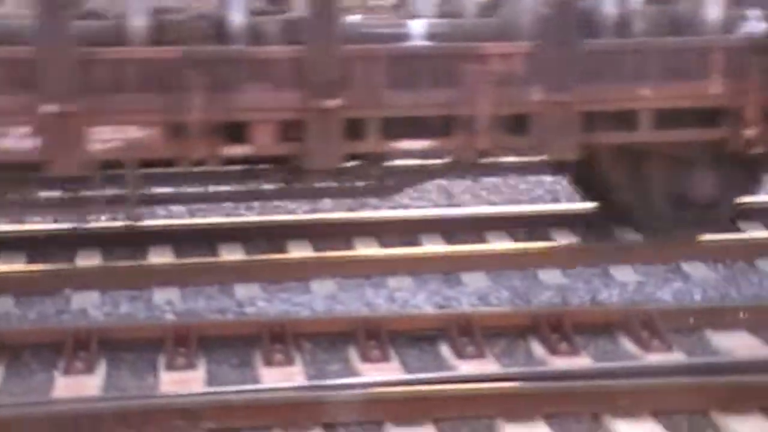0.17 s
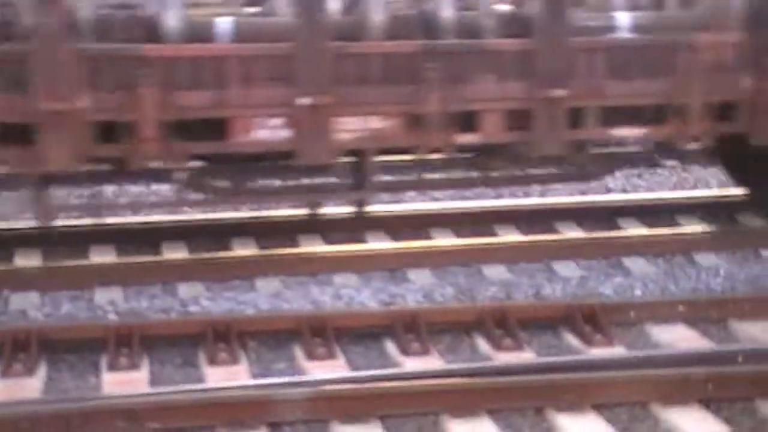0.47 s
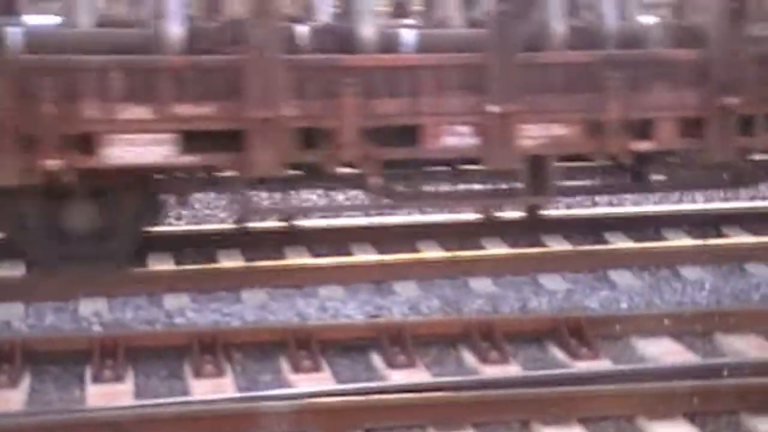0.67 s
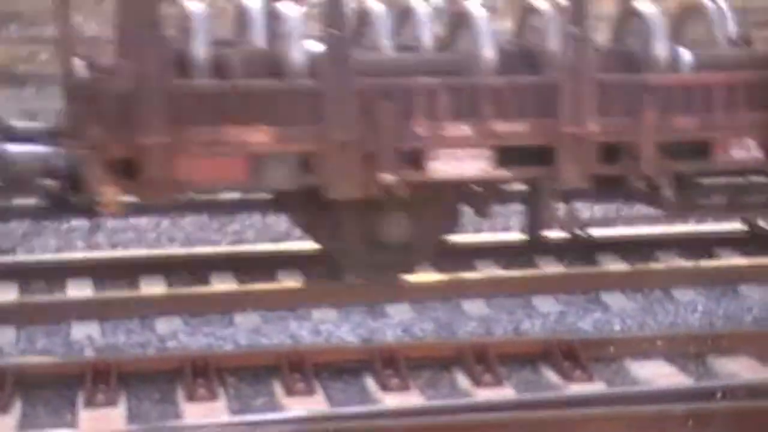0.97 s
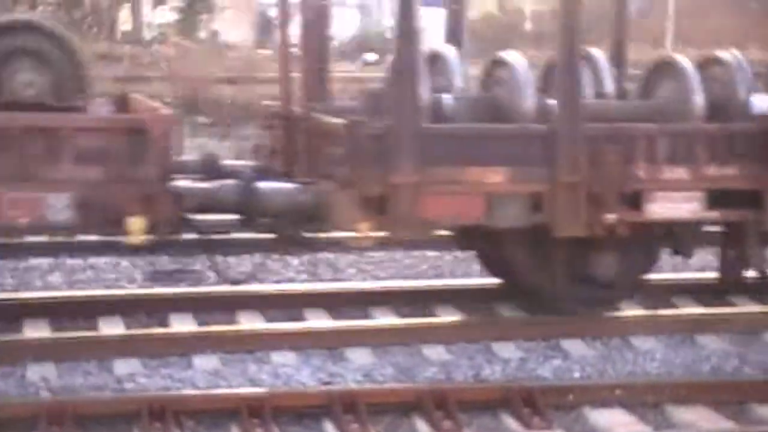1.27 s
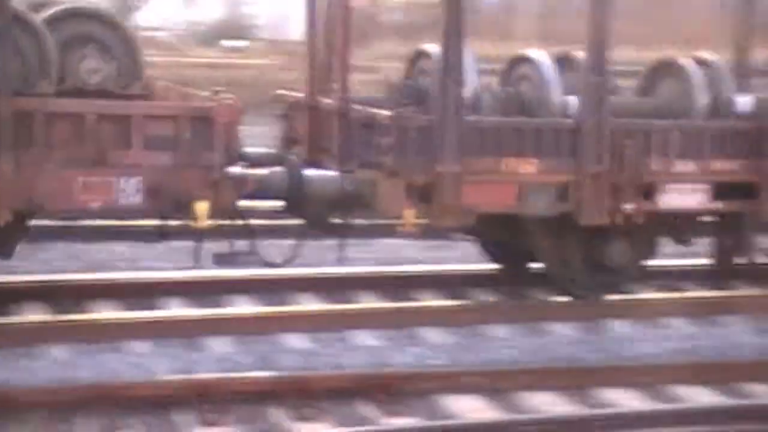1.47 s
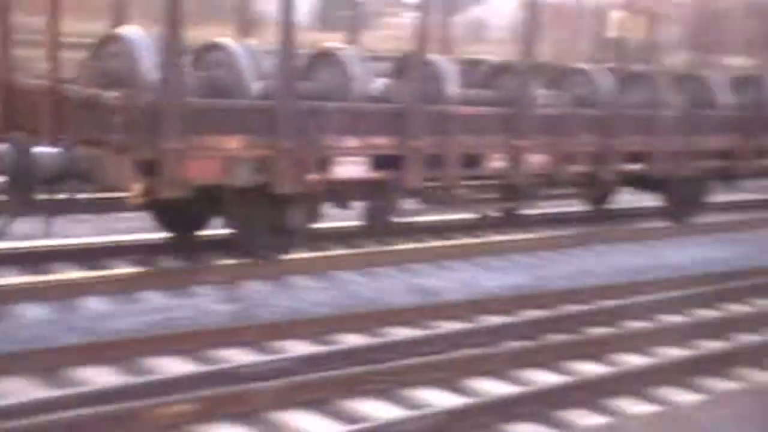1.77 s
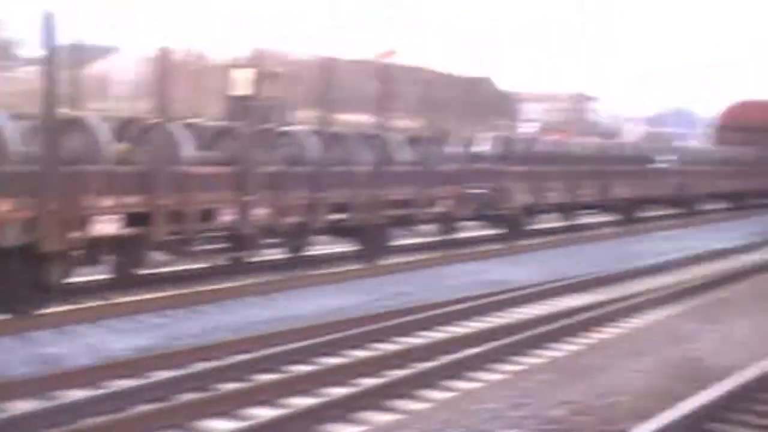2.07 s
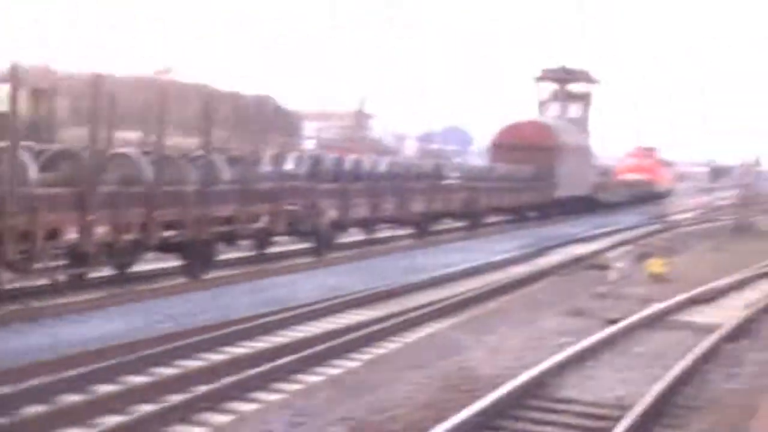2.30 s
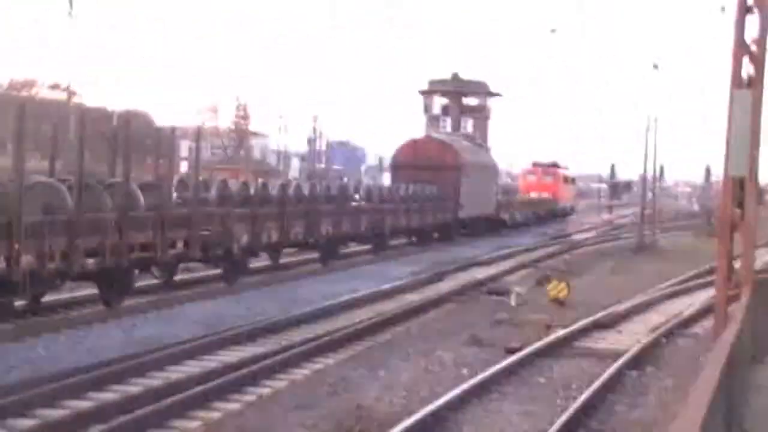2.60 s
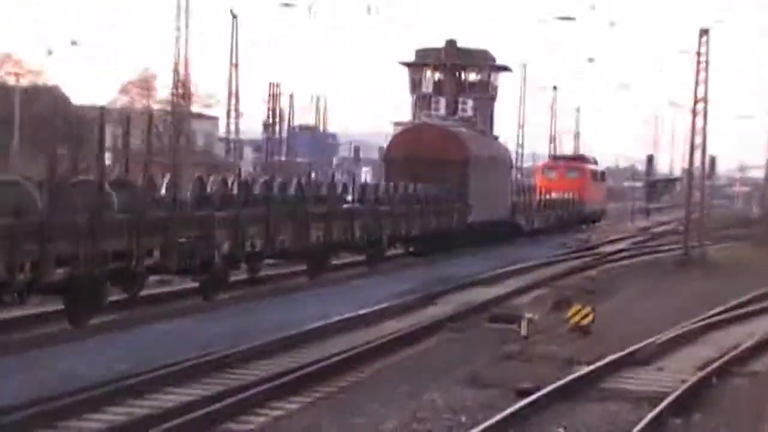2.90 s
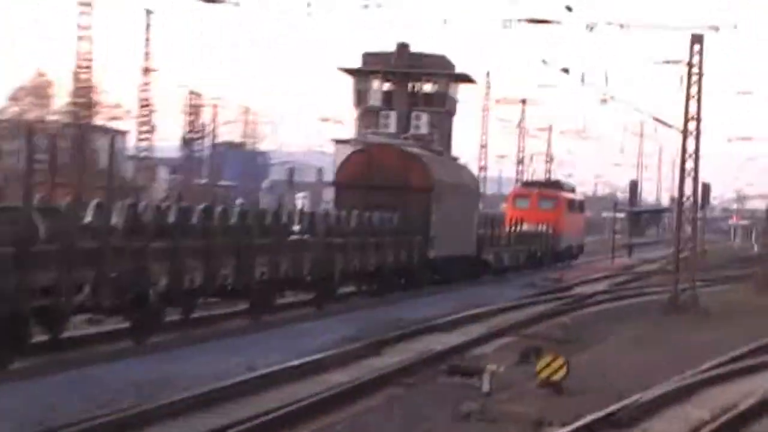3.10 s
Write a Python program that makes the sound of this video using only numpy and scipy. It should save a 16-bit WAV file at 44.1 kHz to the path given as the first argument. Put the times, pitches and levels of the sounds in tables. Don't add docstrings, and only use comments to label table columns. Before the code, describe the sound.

A freight train roars past close by, wheels squealing thinly, with knocks and steel clanks.

```python
import sys
import numpy as np
from scipy import signal
from scipy.fft import rfft, irfft
from scipy.io import wavfile
from scipy.ndimage import uniform_filter1d

SR = 44100
rng = np.random.default_rng(int(sys.argv[2]) if len(sys.argv) > 2 else 0)


def unload_audio(sound):
    columns = np.transpose(np.atleast_2d(sound))
    steps = np.round(np.clip(columns, -1, 1) * 32767)
    wavfile.write(sys.argv[1], SR, steps.astype(np.int16))


def makeup_ratio(level_db):
    decades = np.asarray(level_db, float) / 20
    return 10 ** decades


N = 143325

# (frequency [Hz], spectrum level [dB])
ROAR_SPECTRUM = [(45, -59), (100, -30), (200, -2.5), (900, -1.5), (2200, -7), (5500, -18), (8500, -19),
                 (11500, -34.5)]
# (time [s], level at 1 kHz [dB], level at 4 kHz [dB], level at
# 9 kHz [dB])
WHEEL_SURGES = [(.03, 2.5, 1.5, 3.5), (.19, 4, .5, 2), (.30, 3, 2, -0.5), (.39, 2, -0.5, 3),
                (.69, 3, 2, 0.5), (.76, 1.5, 2, 1), (.93, 1, -1.5, 3), (1.12, 2.5, -0.5, 3),
                (1.31, 1.5, 1, 2.5), (1.39, 2, 1.5, 2), (1.52, 3.5, 1, 4.5), (1.96, 3.5, 1.5, 4),
                (2.08, 3, 3, 0), (2.30, 2, 1, 2.5), (2.39, 4, 3, 5), (2.6, 2.5, 1.5, -4), (2.71, 3, 1.5, 3),
                (2.81, 3.5, 4, 3), (3.1, 3.5, 2.5, 3), (3.23, 1, 2.5, 1)]
# (time [s], treble [dB], hiss [dB])
DISTANCE_AND_HISS = [(0, 1, 2.5), (.22, 1, 2), (.32, 1, -3), (.55, 1, 0), (1.03, .7, -2.5), (1.15, 0, 2.5),
                     (1.35, 0, -1.5), (1.55, 0, 3), (1.72, -1, -1), (1.95, 0, 1.5), (2.07, 0, -3),
                     (2.55, -1.5, -1), (3.1, -1, -2), (3.25, -1, 0)]
# (frequency [Hz], correlation [0 to 1])
CHANNEL_LIKENESS = [(60, 0.66), (170, 0.97), (480, 0.95), (1340, 0.87), (3770, 0.77), (10600, 0.34)]
# (frequency [Hz], left minus right [dB])
CHANNEL_BALANCE = [(60, 7), (170, 3.5), (480, 2), (1340, 2.5), (3770, 3.5), (10600, -1.5)]
# (frequency [Hz], phase lead [rad])
LEFT_LEAD = [(200, 0), (2000, 0.1), (7000, 0.57), (8800, 2), (10000, 2.5)]
# (frequency [Hz], width [Hz], level [dB])
WAGON_BODIES = [(144.3, 55, -32.5), (208.4, 76, -26.5), (234.7, 71, -24), (327.3, 47, -30)]
# (frequency [Hz], width [Hz], level [dB])
WHEEL_DISCS = [(7690, 210, -33.5), (7670, 480, -37), (8930, 120, -44.5), (4440, 63, -42.5),
               (1574, 185, -27), (2070, 124, -31.5), (873, 210, -29.5)]
# (first wheel [Hz], second wheel [Hz])
SQUEAL_PITCHES = (7688.5, 7716)
# (time [s], first wheel [dB], second wheel [dB])
SQUEAL_LEVELS = [(.03, -35, -38), (.2, -44, -38), (.43, -46, -44), (.52, -31, -29), (.64, -28, -38),
                 (.76, -39, -35), (.92, -32, -26), (1.04, -35, -32), (1.12, -39, -48), (1.45, -34, -54),
                 (1.62, -42, -48), (1.97, -39, -39), (2.1, -31, -50), (2.35, -28, -46), (2.66, -32, -46),
                 (2.78, -48, -48), (3.05, -44, -53), (3.22, -46, -47)]
# (time [s], pitch above rest [Hz])
SECOND_WHEEL_PITCH = [
    (0, 10),
    (.25, 18),
    (.48, 10),
    (.6, 2),
    (.8, 0),
    (1.8, 0),
    (2.0, 10),
    (3.25, 5),
]
# (time [s], pitch [Hz], level [dB], length [s])
STEEL_CLANKS = [
    (.29, 900, -24, .06),
    (.70, 1000, -30, .08),
    (1.51, 850, -27, .05),
    (1.96, 1500, -29, .05),
    (2.385, 790, -19.5, .08),
    (2.80, 600, -22, .09),
    (2.82, 950, -25, .08),
    (2.0, 285, -21, .1),
    (1.66, 285, -23, .09),
]
# (time [s], peak level [dB])
JOINT_KNOCKS = [
    (.4113, -1.5),
    (1.042, -9),
    (2.387, -8),
]


def evened(x):
    return x / np.sqrt(np.mean(x ** 2) + 1e-20)


def read(points, hz):
    f, value = np.transpose(points)
    return np.interp(np.log(hz + 1), np.log(f + 1), value)


def drift(rate_hz, count):
    hz = np.fft.rfftfreq(count, 1 / SR)
    return evened(irfft(rfft(rng.standard_normal(count)) / (1 + (hz / rate_hz) ** 4), count))


def smoothed(grid, hz_bins, frames):
    return evened(uniform_filter1d(uniform_filter1d(grid, size=hz_bins, axis=0), size=frames, axis=1))


def at_microphones(gain, size):
    pan_db_per_s = 0.66
    hz = np.fft.rfftfreq(size, 1 / SR)[:, None]
    t = np.arange(gain.shape[1]) * size / 4 / SR
    a, b, c, d = rng.standard_normal(gain.shape[::-1] + (4,)).T
    same = np.clip(read(CHANNEL_LIKENESS, hz), 0, 1)
    balance_db = read(CHANNEL_BALANCE, hz) + pan_db_per_s * (t - N / SR / 2)
    half = makeup_ratio(balance_db / 2) * np.exp(.5j * read(LEFT_LEAD, hz))
    left = a + 1j * b
    right = same * left + np.sqrt(1 - same ** 2) * (c + 1j * d)
    z = gain * np.array([left * half, right / half])
    sound = signal.istft(z, nperseg=size, noverlap=3 * size // 4)[1]
    return evened(sound[:, size // 2:N + size // 2])


def roar():
    size, hop, level_db, surge_s = 512, 128, -16.5, 0.024
    hz = np.fft.rfftfreq(size, 1 / SR)[:, None]
    t = np.arange(N // hop + 5) * hop / SR
    patches = smoothed(rng.standard_normal((len(t), len(hz))).T, 8, 24)
    flicker = drift(38, N + 8 * hop)[::hop][:len(t)] * np.clip(hz / 5000, 0, 1)
    surge = 0
    for s, low, mid, top in WHEEL_SURGES:
        color = read([(250, 0), (500, 0.74 * low), (1000, low), (4000, mid), (9000, top)], hz)
        surge = surge + color * np.exp(-.5 * ((t - s) / surge_s) ** 2)
    at, treble, hiss = np.transpose(DISTANCE_AND_HISS)
    dull = np.interp(t, at, treble) * read([(1500, 0.59), (4000, 1.27), (9000, 1.2)], hz)
    dull = dull + np.interp(t, at, hiss) * read([(8000, 0), (11000, 1.2)], hz)
    gain_db = read(ROAR_SPECTRUM, hz) + surge + dull + 0.52 * patches + 0.52 * flicker
    return makeup_ratio(level_db) * at_microphones(makeup_ratio(gain_db), size)


def ringing(modes, hz, order):
    return np.sqrt(sum(makeup_ratio(db) ** 2 / w / (1 + (2 * (hz - f) / w) ** 2) ** order for f, w, db in modes))


def total_db(modes):
    return 10 * np.log10(sum(makeup_ratio(db) ** 2 for _, _, db in modes))


def wagons():
    size, out = 4096, 0
    hz = np.fft.rfftfreq(size, 1 / SR)[:, None]
    frames = N // 1024 + 5
    for modes, order, patchy_db in ((WAGON_BODIES, 2, .8), (WHEEL_DISCS, 1, 1.6)):
        patches = smoothed(rng.standard_normal((frames, len(hz))).T, 40, 3)
        shape = ringing(modes, hz, order) * hz ** 2 / (hz ** 2 + 150 ** 2)
        out = out + makeup_ratio(total_db(modes)) * at_microphones(shape * makeup_ratio(patchy_db * patches), size)
    return out


def squeal():
    wander_hz, flutter_db, level_db = 2.2, 1.6, 1.5
    pan_db, lead_rad = -1, -.8
    t, out = np.arange(N) / SR, np.zeros((2, N))
    at, *wheels = np.transpose(SQUEAL_LEVELS)
    side = np.array([[.5], [-.5]])
    for k, rest_hz in enumerate(SQUEAL_PITCHES):
        sharp_hz = k * np.interp(t, *np.transpose(SECOND_WHEEL_PITCH))
        pitch_hz = rest_hz + sharp_hz + wander_hz * drift(7.4, N)
        turn = 2 * np.pi * np.cumsum(pitch_hz) / SR
        tone_db = level_db + np.interp(t, at, wheels[k]) + flutter_db * drift(20, N)
        out += np.sqrt(2) * makeup_ratio(tone_db + side * pan_db) * np.sin(turn + side * lead_rad)
    return out


def clanks():
    width_hz, rise_s, spread = 150, .025, .35
    out, t = np.zeros((2, N)), np.arange(8000) / SR
    shakes = rng.standard_normal((len(STEEL_CLANKS), 3, len(t)))
    for (s, hz, db, length), shake in zip(STEEL_CLANKS, shakes):
        plate = signal.butter(1, [hz - width_hz, hz + width_hz], "bandpass", fs=SR, output="sos")
        ring = evened(signal.sosfilt(np.vstack([plate, plate]), shake[0] + spread * shake[1:]))
        swell = np.minimum(t / rise_s, 1) * np.exp(-(t / length) ** 2)
        out[:, round((s - rise_s) * SR):][:, :len(t)] += makeup_ratio(db) * ring * swell
    return out * makeup_ratio(np.array([[1.5], [-1.5]]))


def knocks():
    push_s, push_hz, rebound = .0005, 650, 1.5
    t, out = np.arange(-200, 800) / SR, np.zeros(N)
    fade = np.where(t < 0, np.exp(t / push_s), np.exp(-t / (rebound * push_s)))
    push = -np.cos(2 * np.pi * push_hz * t) * fade
    swell = np.hanning(len(t))
    push = push - np.mean(push * swell) / np.mean(swell ** 2) * swell
    for s, db in JOINT_KNOCKS:
        out[round(s * SR) - 200:][:len(t)] += makeup_ratio(db) * push
    return out * makeup_ratio(np.array([[1.5], [-1.5]]))


def scene():
    return roar() + wagons() + squeal() + clanks() + knocks()


def limited(x):
    threshold_db, recover_s = -5, 0.028
    t, duck_db = np.arange(N) / SR, 0
    for s, db in JOINT_KNOCKS:
        over_db = max(db - threshold_db, 0)
        duck_db = duck_db + over_db * (t > s + .001) * np.exp(-abs(t - s) / recover_s)
    return x / makeup_ratio(uniform_filter1d(duck_db, size=88))


def thinned_treble(x):
    start_hz, edge_hz, band_db, line_db = 9300, 10600, -.5, 1
    hz, _, z = signal.stft(x, SR, "cosine", nperseg=2048, noverlap=1024)
    power = (abs(z) ** 2).mean(0)
    bands = uniform_filter1d(power, size=3, axis=1)[:1024].reshape(64, 16, -1)
    bands = bands.mean(1).repeat(16, 0)
    bands = np.vstack([bands, bands[-1:]])
    edge = np.median(bands[np.searchsorted(hz, edge_hz)])
    strong_bands = bands > makeup_ratio(band_db) ** 2 * edge
    strong_lines = uniform_filter1d(power, size=3, axis=0) > makeup_ratio(line_db) ** 2 * edge
    keep = strong_bands & strong_lines | (hz < start_hz)[:, None]
    return signal.istft(z * keep, SR, "cosine", nperseg=2048, noverlap=1024)[1][:, :N]


def band_limit(x):
    return signal.sosfilt(signal.butter(12, 11400, fs=SR, output="sos"), x)


def record(dry):
    low_cut = signal.butter(3, 102.5, "highpass", fs=SR, output="sos")
    held = signal.sosfilt(low_cut, limited(dry))
    mix = thinned_treble(np.clip(held, -.93, .93))
    return band_limit(mix)


dry = scene()
out = record(dry)
unload_audio(out)
```